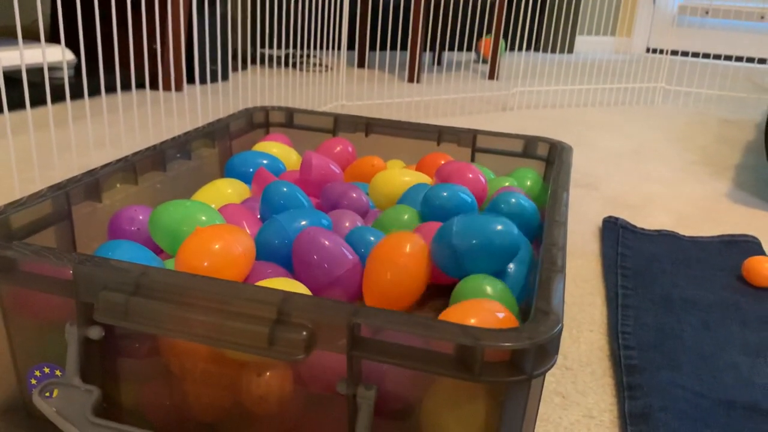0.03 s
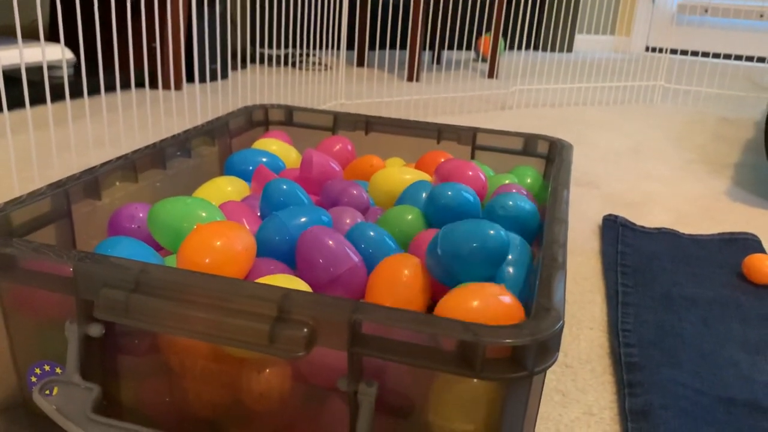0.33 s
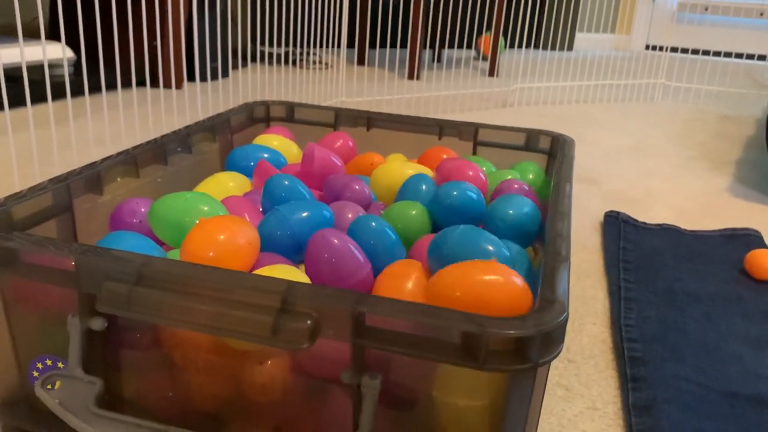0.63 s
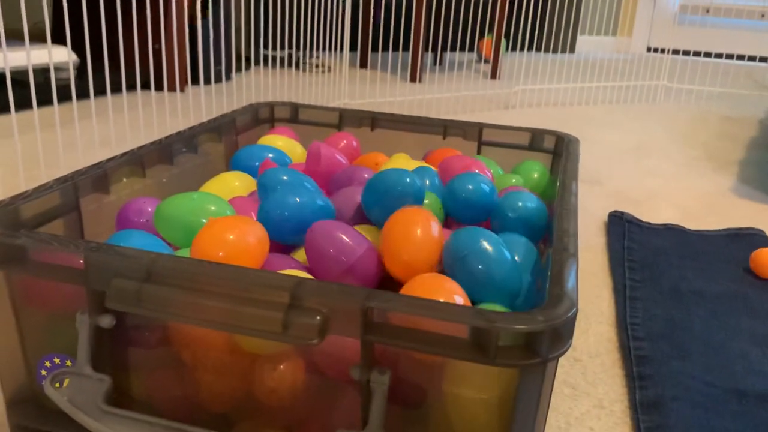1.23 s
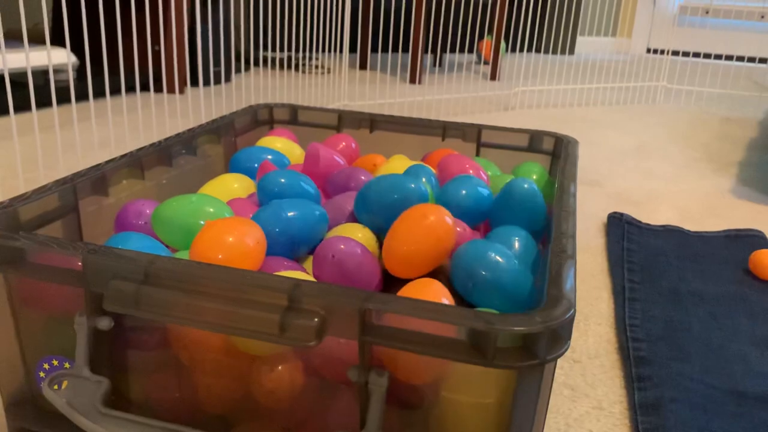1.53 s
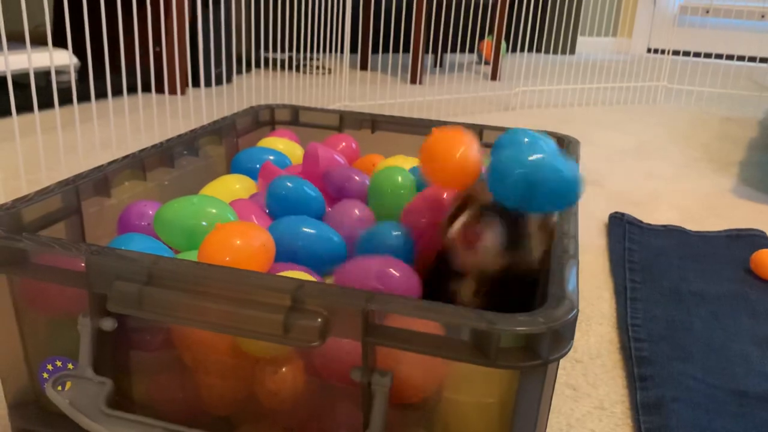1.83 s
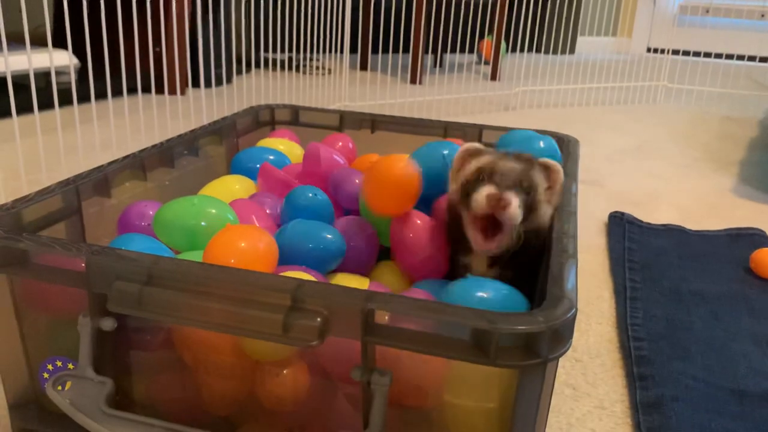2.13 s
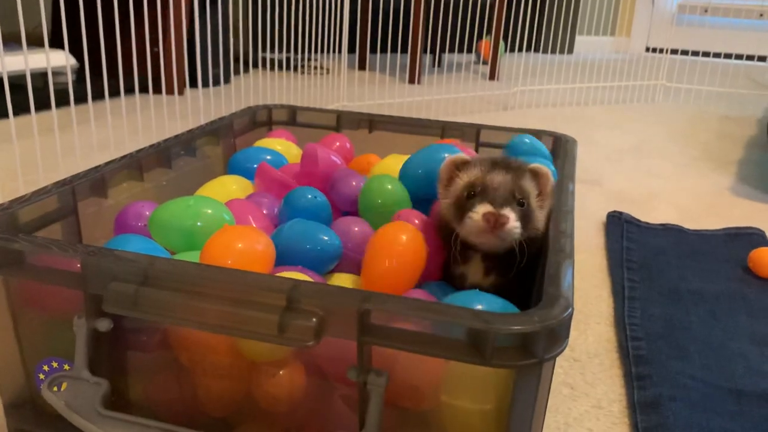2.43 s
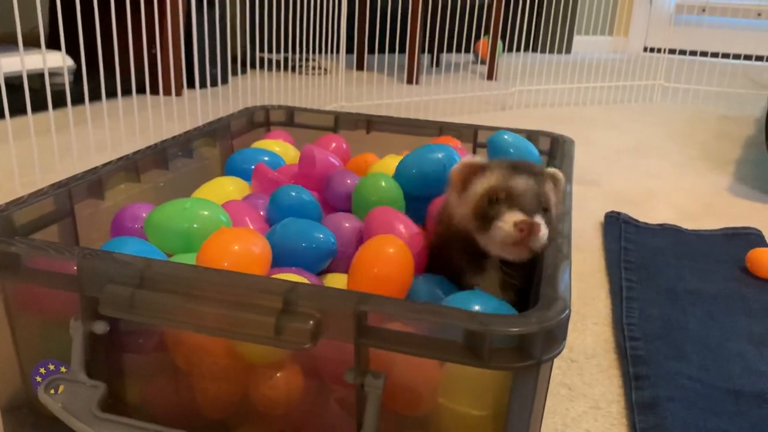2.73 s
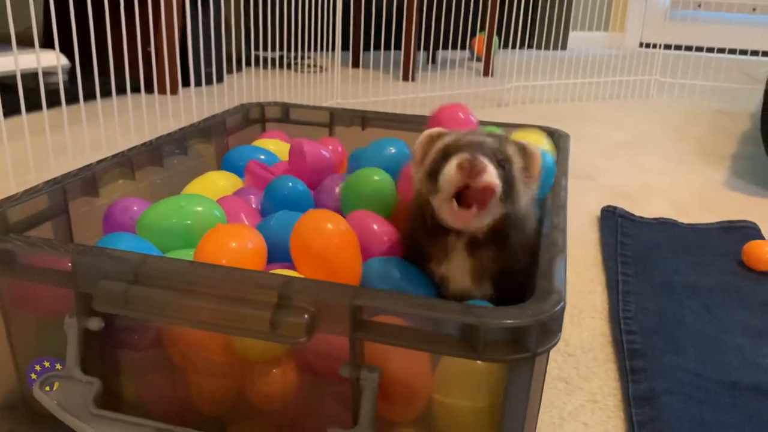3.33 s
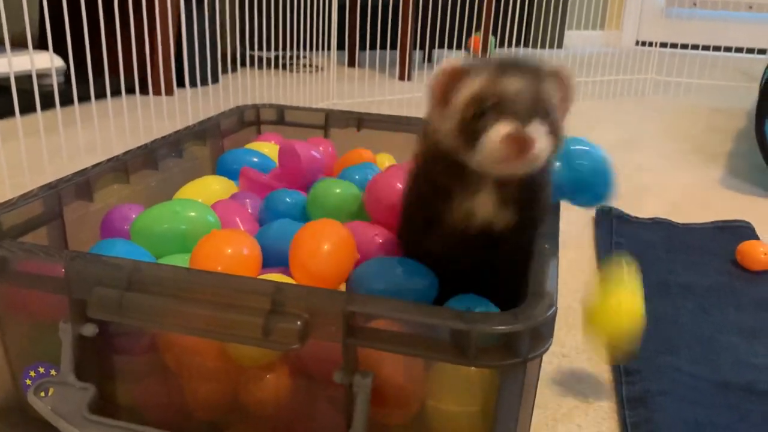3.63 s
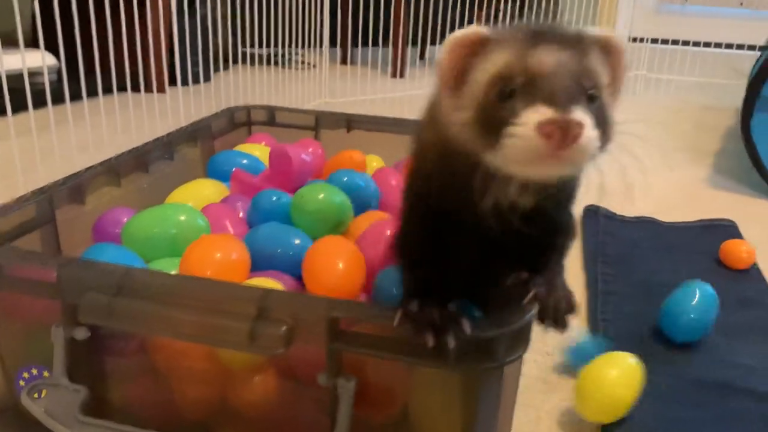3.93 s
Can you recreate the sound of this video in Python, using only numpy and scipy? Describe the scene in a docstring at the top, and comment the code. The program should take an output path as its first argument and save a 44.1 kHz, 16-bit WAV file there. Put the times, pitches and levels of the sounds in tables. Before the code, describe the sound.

Close up in a quiet room, plastic eggs click, knock and rub together as an animal pushes through them. Scattered taps build to uneven bursts of clatter, with soft thumps from the bin, loudest near the end.

```python
"""Ferret in a bin of plastic eggs

A ferret burrows up through hollow plastic eggs, pauses, then climbs out over the rim. Each contact
gives a hard tick, a hollow shell knock and a slightly later thump of the plastic bin. Small contacts
jostle and rub under the loud ones. A carpeted room rings briefly around a close stereo microphone."""
import sys
import numpy as np
from scipy import signal
from scipy.fft import rfft, irfft
from scipy.io import wavfile
from scipy.ndimage import uniform_filter1d

SR = 44100
rng = np.random.default_rng(int(sys.argv[2]) if len(sys.argv) > 2 else 0)


def digitize_waveform(pressure):
    """Quantize a signal to 16-bit integers and store it at the path in sys.argv[1].

    Rows of a 2-D input are taken as channels; values are limited to [-1, 1].
    """
    field = np.atleast_2d(pressure).T
    bounded = np.clip(field, -1, 1)
    quanta = np.round(bounded * 32767).astype(np.int16)
    wavfile.write(sys.argv[1], SR, quanta)


N = 176400

# loud collisions: t/s, shell f/Hz, thump level/dB, knock level/dB, tick level/dB
COLLISIONS = [(0.0068, 1002, -47, -33, -50.5), (0.246, 3260, -72, -49.5, -64), (0.53, 604, -48, -55, -82),
              (0.558, 551, -49, -46, -89), (0.598, 567, -67.5, -45, -78), (0.736, 1240, -46, -41, -42),
              (0.798, 940, -48, -39.5, -38.5), (0.9033, 957, -29.5, -31.5, -44),
              (1.017, 626, -39, -37.5, -45.5), (1.078, 594, -46, -41.5, -91), (1.29, 1490, -65, -41.5, -45),
              (1.3361, 746, -43, -44, -49.5), (1.3929, 1137, -41, -41.5, -33.5),
              (1.4, 715, -35.5, -39, -68), (1.511, 695, -57, -42, -56), (1.6662, 1450, -53.5, -46.5, -56.5),
              (1.6877, 1370, -38.5, -44, -30), (1.707, 1320, -37.5, -37, -33),
              (1.826, 1135, -29.5, -29.5, -30), (1.882, 1300, -32.5, -32, -42),
              (1.9491, 1003, -29.5, -28.5, -32.5), (1.988, 1314, -42, -33.5, -32.5),
              (2.0216, 1300, -50, -37, -37), (2.0301, 1281, -31.5, -29, -30),
              (2.0966, 1225, -30, -28.5, -34), (2.117, 836, -32.5, -28.5, -36),
              (2.1783, 822, -29.5, -36.5, -36.5), (2.2151, 1370, -36.5, -42, -38.5),
              (2.2371, 950, -50, -37, -59), (2.264, 1110, -30.5, -29, -39),
              (2.4002, 1480, -44, -46.5, -55.5), (2.4399, 1601, -49.5, -46.5, -50.5),
              (2.7136, 850, -30.5, -38.5, -41.5), (2.8325, 1055, -40, -34.5, -47),
              (2.9185, 706.4, -29.5, -41, -51), (2.9615, 850, -39, -31, -45.5),
              (3.008, 650, -38, -34.5, -67), (3.2072, 1737, -44, -37.5, -61), (3.232, 856, -35, -38, -39.5),
              (3.32, 706, -32.5, -32, -37.5), (3.379, 1619, -46.5, -35, -57),
              (3.3921, 1514, -58, -33.5, -44.5), (3.4007, 1158, -37, -27.5, -42),
              (3.46, 1096, -34, -31, -41), (3.477, 832, -23, -35, -48), (3.5412, 1005, -36, -22, -38),
              (3.5432, 1093, -20, -28, -34), (3.5713, 1310, -44, -34.5, -28.5),
              (3.7669, 809.7, -33.5, -42.5, -40), (3.8768, 1302, -37, -41.5, -39.5),
              (3.9147, 774, -23.5, -33, -32)]
# light snaps of shell edges: t/s, tick level/dB
EDGE_SNAPS = [(0.314, -68), (.612, -56), (.845, -39), (0.88, -34.5), (.957, -41), (0.973, -42.5),
              (1.27, -49), (1.353, -40.5), (1.788, -40.5), (1.8136, -37), (1.9202, -39.5), (2.038, -44),
              (2.156, -42.5), (2.258, -36), (2.883, -45.5), (2.946, -42), (3.0866, -44), (3.279, -45),
              (3.327, -41), (3.622, -38.5), (3.735, -43), (3.787, -41.5)]
# heap jostle as the animal pushes: t/s, thump level/dB, knock level/dB, tick level/dB
PUSH_CURVE = [(0, -53, -51, -63), (0.06, -47, -50.5, -62), (0.16, -64.5, -67, -81), (0.214, -51, -49, -73),
              (0.29, -60.5, -63, -81), (0.65, -51, -59, -68), (0.78, -47.5, -45, -56),
              (0.922, -36.5, -40, -43.5), (1.029, -57, -47.5, -52.5), (1.188, -59, -79.5, -100),
              (1.258, -43.5, -45.5, -51), (1.41, -42.5, -44.5, -63), (1.489, -56, -56, -78),
              (1.649, -70, -78, -92), (1.714, -43, -43, -48), (1.84, -37.5, -35.5, -42.5),
              (2.04, -39.5, -38, -42), (2.19, -55, -46, -75), (2.29, -41, -45.5, -48),
              (2.36, -62, -56, -83), (2.47, -67, -62.5, -80), (2.6, -86, -86, -97.5),
              (2.634, -48.5, -47, -58.5), (2.688, -42, -41.5, -44), (2.81, -41.5, -45.5, -54.5),
              (2.969, -38, -37.5, -49.5), (3.09, -45, -46, -55), (3.34, -38.5, -38, -44.5),
              (3.431, -43, -41, -48), (3.559, -28, -26.5, -32.5), (3.699, -45.5, -46, -59),
              (3.831, -42.5, -50, -59), (3.941, -42.5, -29.5, -41), (4.0, -40, -56, -65)]
# egg shell modes: f/pitch, level/dB, t60/s
SHELL_MODES = [(.52, -7, 0.016), (.8, -6.5, 0.011), (1.02, -2, 0.013), (1.25, -6, 0.014), (1.6, -14, 0.015),
               (2.4, -15.5, 0.012)]
# loaded bin modes, before BIN_TUNING: f/Hz, level/dB, t60/s
BIN_MODES = [(136, -22, 0.067), (180, -7.5, 0.04), (265.7, 0.5, 0.039), (348.7, 1, 0.036),
             (462.4, -2, 0.023), (554, 1, 0.034), (680, -9, 0.016), (877, -11.5, 0.037)]
# tick spectrum: f/Hz, level/dB
TICK_SPECTRUM = [(500, -14.5), (1500, 3), (4000, 6), (5500, -8.5), (7000, 0), (13000, 3.5), (16000, -12)]
# shell sliding on shell: f/Hz, level/dB
RUB_SPECTRUM = [(600, -28), (2200, 0), (5500, -5.5), (9000, -37)]
# still room air: f/Hz, level/dB
AIR_SPECTRUM = [(20, -11.5), (48, 3), (110, 3.5), (500, -26.5), (16000, -42.5)]
# microphone pair: f/Hz, left phase lead/rad
MIC_PHASE = [(0, 0), (1600, .5), (3000, 2.8), (5200, 2.7), (6000, 0), (17000, -14)]

# triples: thump, knock, tick
CLACK_TRIM_DB, JOSTLE_TRIM_DB = (-0.8, -0.2, -0.46), (-1.3, -4, -1.5)
HEAP_DB, ROOM_DB, STEREO_WIDTH = (-9, -7, -10.5), (-7, -8, -11), (0.49, 0.99, 0.74)
PART_SPREAD_DB = (4, 3, 1)

EGG_HZ, EGG_LOG_SPREAD, BIN_TUNING = 1093, 0.27, 0.98
CONTACT_S, LEAD_IN_S, LEAD_IN_DB = 0.01, 0.005, -16
HEAVY_FROM_DB, HEAVY_TILT_PER_OCT = -30.5, 0.71
CONTACTS_PER_S, FULL_PUSH_DB, HALF_RATE_DB = 400, -38, 9
HEAP_T60_S, HEAP_DELAY_S, ROOM_T60_S, ROOM_DELAY_S = 0.048, 0.001, 0.19, 0.00579


def clacks():
    """Eggs hit each other or drop against the wall; light snaps only tick."""
    out = np.zeros((3, 2, N))
    snaps = [(start, EGG_HZ, -np.inf, -np.inf, db) for start, db in EDGE_SNAPS]
    for start, hz, *db in COLLISIONS + snaps:
        gain = undb(np.array(db) + CLACK_TRIM_DB) * np.sqrt(CONTACT_S * SR)
        tilt = HEAVY_TILT_PER_OCT * max(db[0] - HEAVY_FROM_DB, 0)  # harder thumps go deeper
        add(out, start, place(contact(hz, tilt)) * gain[:, None, None])
        lead_in = unit(tick(clock(LEAD_IN_S)))  # faint hiss, softens the tick's attack
        add(out[2], start - LEAD_IN_S, lead_in * gain[2] * undb(LEAD_IN_DB))
    return out


def contact(shell_hz, tilt_db_per_oct=0, low_cut_hz=139.5, tick_rise_s=0.0005, tick_t60_s=0.0055):
    """One collision: bin thump, shell knock and tick, each at unit energy."""
    wall = [(hz, db - tilt_db_per_oct * np.log2(hz / BIN_MODES[0][0]), t60) for hz, db, t60 in BIN_MODES]
    thump = ring(wall, BIN_TUNING, log_spread=0.081, spread_db=4, rise_s=0.0019, lag_cycles=1.025)
    knock = ring(SHELL_MODES, shell_hz, log_spread=0.067, spread_db=2.5, rise_s=0.00029, lag_cycles=0.4)
    low_cut = signal.butter(2, low_cut_hz, "high", fs=SR, output="sos")
    thump, knock = signal.sosfilt(low_cut, [thump, knock])
    t = np.arange(len(knock)) / SR
    crack = (1 - np.exp(-t / tick_rise_s)) * fade(t, tick_t60_s)
    return unit(np.array([thump, knock, tick(crack)]))


def ring(modes, pitch, log_spread, spread_db, rise_s, lag_cycles):
    """Struck modes: tuning and strength vary with the strike point; low bending waves arrive late."""
    base, db, t60 = np.array(modes, float).T[:, :, None]
    detune, strength, sign = rng.standard_normal((3, len(modes), 1))
    hz = base * pitch * np.exp(log_spread * detune)
    t = np.maximum(clock(0.08) - lag_cycles / hz, 0)
    waves = np.sin(2 * np.pi * hz * t) * fade(t, t60) * (1 - np.exp(-t / rise_s))
    return np.sum(np.sign(sign) * undb(db + spread_db * strength) * waves, axis=0)


def tick(envelope, peak_db=9, peak_width_oct=0.35):
    """Crack of hard plastic: noise with one resonance that varies per contact."""
    hz, db = np.array(TICK_SPECTRUM, float).T
    grid_hz = np.geomspace(hz[0], hz[-1], 48)
    centre_hz = np.geomspace(hz[2], hz[-3], 48)[rng.integers(48)]
    resonance_db = peak_db * np.exp(-(np.log2(grid_hz / centre_hz) / peak_width_oct) ** 2)
    burst = rng.standard_normal(len(envelope)) * envelope
    return colour(burst, np.c_[grid_hz, np.interp(grid_hz, hz, db) + resonance_db])


def place(parts, spread_db=3.5):
    """Random spot across the bin, thump centred: parts x channels x time."""
    pan_db = spread_db * rng.standard_normal() * np.array([0, 1, 1])
    return parts[:, None] * undb(np.array([pan_db, -pan_db]).T / 2)[:, :, None]


def jostle(egg_count=90, spread_db=3):
    """Small contacts among many eggs: separate taps under a light push, a stream under a hard one."""
    detunes = np.clip(rng.standard_normal(egg_count), -2, 2)
    eggs = [place(contact(hz)) for hz in EGG_HZ * np.exp(EGG_LOG_SPREAD * detunes)]
    slots = int(CONTACTS_PER_S * N / SR)
    jitter = rng.standard_normal((slots, 5))
    times = (np.arange(slots) + jitter[:, 0]) / CONTACTS_PER_S
    strength = np.clip(jitter[:, 1:], -2, 2)
    sizes = undb(spread_db * strength[:, :1] + PART_SPREAD_DB * strength[:, 1:])
    sizes /= np.sqrt(np.mean(sizes ** 2) * CONTACTS_PER_S / SR)
    push_s, *levels_db = np.array(PUSH_CURVE, float).T
    push_db = np.array([np.interp(times, push_s, db) for db in levels_db]).T
    share = np.minimum(2 ** ((push_db[:, 1] - FULL_PUSH_DB) / HALF_RATE_DB), 1)  # of slots that sound
    tally = np.floor(np.cumsum(share * rng.uniform(0.5, 1.5, slots)))
    hits = np.diff(tally, prepend=0) > 0
    gains = sizes * undb(push_db + JOSTLE_TRIM_DB) / np.sqrt(share)[:, None]
    picks = rng.integers(egg_count, size=slots)
    out = np.zeros((3, 2, N))
    for start, gain, egg in zip(times[hits], gains[hits], picks[hits]):
        add(out, start, eggs[egg] * gain[:, None, None])
    return out


def rubbing(knocks, relative_db=-8.5, smear_s=0.0098):
    """Shells slide on each other around every small knock, all over the bin."""
    power = uniform_filter1d(np.mean(knocks ** 2, axis=0), int(smear_s * SR))
    force = np.sqrt(np.abs(power))
    friction = np.array([colour(noise, RUB_SPECTRUM) for noise in rng.standard_normal((2, N))])
    return undb(relative_db) * force * unit(friction) * np.sqrt(N)


def bump(start_s=1.03, length_s=0.09, start_hz=134.3, sink_s=0.088, level_db=-41.5):
    """Soft low bump, sinking in pitch."""
    t = clock(length_s)
    phase = 2 * np.pi * np.cumsum(start_hz * np.exp(-t / sink_s)) / SR
    out = np.zeros(N)
    add(out, start_s, undb(level_db) * np.sin(phase) * np.sin(np.pi * t / length_s) ** 2)
    return out


def space(heap_db, room_db, width):
    """Stereo response: direct sound, quick scatter in the bin, short room tail."""
    t = clock(0.54)
    angle = width * np.pi / 4
    response = np.zeros((2, len(t)))
    response[:, 0] = 1
    for db, t60, delay in ((heap_db, HEAP_T60_S, HEAP_DELAY_S), (room_db, ROOM_T60_S, ROOM_DELAY_S)):
        mid, side = rng.standard_normal((2, len(t)))
        echoes = np.cos(angle) * mid + np.sin(angle) * np.array([side, -side])
        response += undb(db) * unit(echoes * fade(t, t60) * (t > delay))
    return response


def air(mid_db=-60.5, side_gain=0.44):
    """Faint low rumble of the room."""
    mid, side = (unit(colour(noise, AIR_SPECTRUM)) for noise in rng.standard_normal((2, N)))
    return undb(mid_db) * np.sqrt(N) * (mid + side_gain * np.array([side, -side]))


def undb(db):
    """Decibels to gain."""
    return 10 ** (np.asarray(db) / 20)


def clock(length_s):
    """Sample times."""
    return np.arange(int(length_s * SR)) / SR


def fade(t, t60):
    """Exponential decay."""
    return np.exp(-np.log(1000) * t / t60)


def unit(x):
    """Scale to unit energy."""
    return x / np.sqrt(np.sum(x ** 2, axis=-1, keepdims=True) + 1e-20)


def colour(x, spectrum, size=4096):
    """Minimum-phase filter through points f/Hz, level/dB."""
    hz, db = np.array(spectrum, float).T
    grid_hz = np.fft.rfftfreq(size, 1 / SR)
    gain = undb(np.interp(np.log(grid_hz + 1), np.log(hz), db))
    cepstrum = irfft(np.log(gain))
    cepstrum[1:size // 2] *= 2
    cepstrum[size // 2 + 1:] = 0
    response = irfft(np.exp(rfft(cepstrum)))
    return signal.fftconvolve(x, response)[:len(x)]


def add(out, start_s, sound):
    """Mix a sound in at a time."""
    i = int(np.clip(start_s * SR, 0, N - 1))
    out[..., i:i + sound.shape[-1]] += sound[..., :N - i]


def scene():
    """Contacts and rubbing sound through heap and room, over the air and one bump."""
    responses = [space(*settings) for settings in zip(HEAP_DB, ROOM_DB, STEREO_WIDTH)]
    background = air() + bump()
    loud = clacks()
    thumps, knocks, ticks = jostle()
    parts = loud + np.array([thumps, knocks, ticks + rubbing(knocks)])
    eggs = sum(signal.fftconvolve(part, response, axes=1) for part, response in zip(parts, responses))
    return background + eggs[:, :N]


def record(dry, top_hz=16500):
    """Microphone pair: in phase in the bass, out of step in the treble; top cut."""
    lead_rad = np.interp(np.fft.rfftfreq(2 * N, 1 / SR), *np.array(MIC_PHASE).T)
    shift = np.exp(0.5j * lead_rad * np.array([[1], [-1]]))
    heard = irfft(rfft(dry, 2 * N) * shift)[:, :N]
    return signal.sosfilt(signal.ellip(8, 0.2, 70, top_hz, fs=SR, output="sos"), heard)


dry = scene()
out = record(dry)
digitize_waveform(out)
```